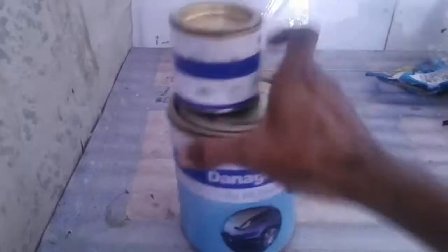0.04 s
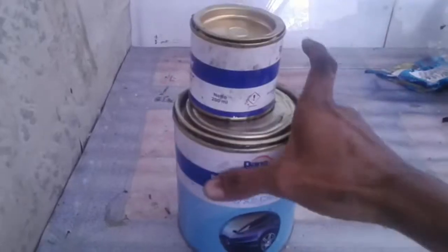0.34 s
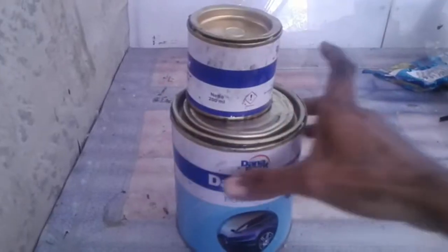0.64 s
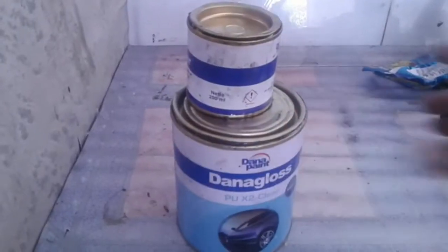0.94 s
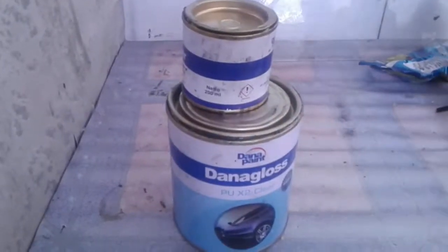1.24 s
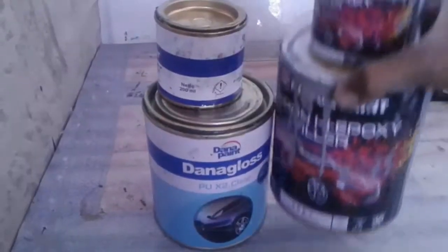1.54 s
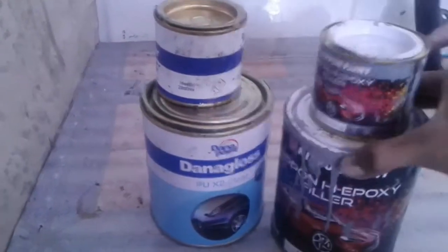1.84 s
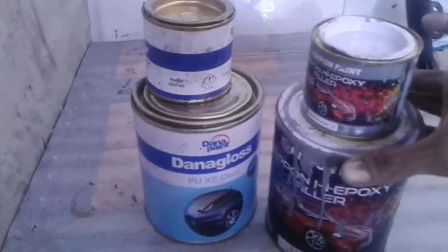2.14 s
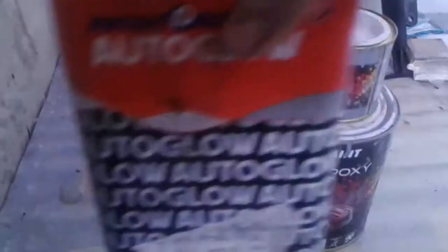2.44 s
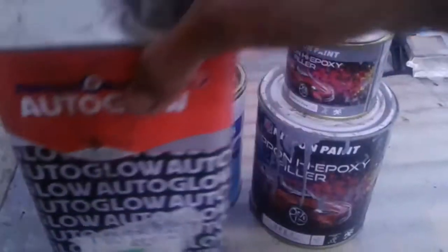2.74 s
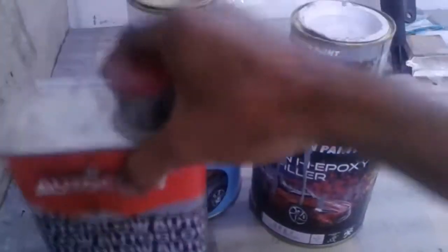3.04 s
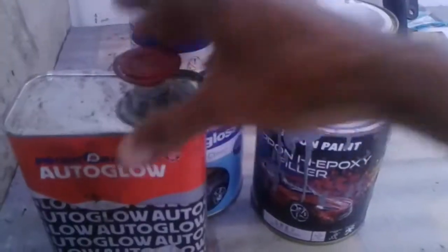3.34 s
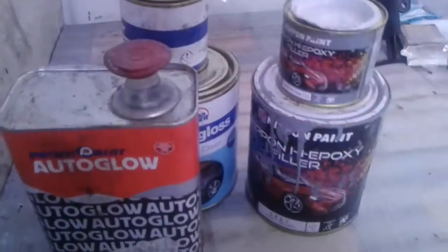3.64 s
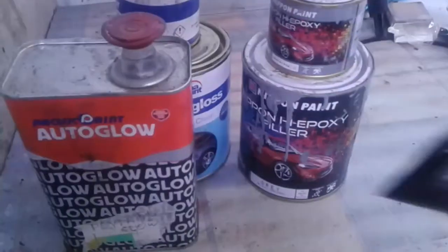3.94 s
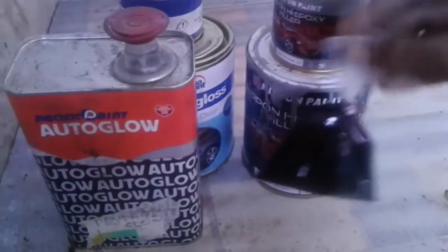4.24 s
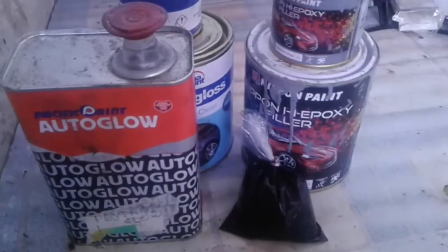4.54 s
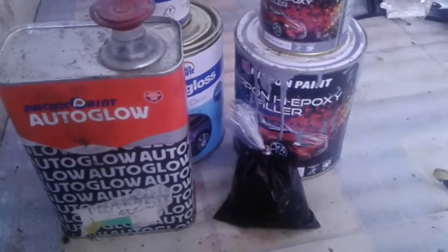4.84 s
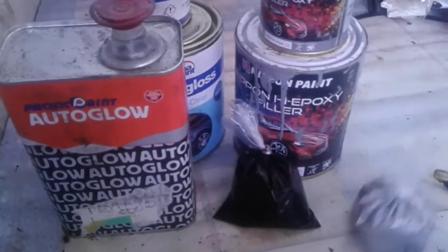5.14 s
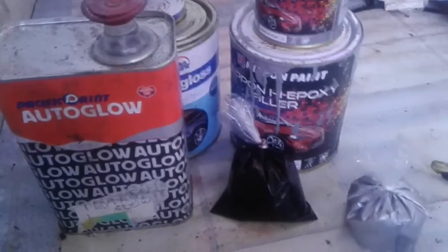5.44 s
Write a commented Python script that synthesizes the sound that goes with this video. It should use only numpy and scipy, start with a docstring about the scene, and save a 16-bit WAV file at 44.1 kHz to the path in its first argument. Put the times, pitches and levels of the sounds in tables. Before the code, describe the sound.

In a small, bare room, a small, dull microphone picks up low room noise and a faint hum. Two stacks of paint cans land on a table in turn, each with a sharp knock, a quick rattle and a metallic ring. A square tin clanks down edge by edge, ringing low. Last come two soft, crinkly plops as small filled plastic bags are dropped on the table.

```python
"""A table in a small, bare room, heard through a small, dull microphone over faint hum and room noise.
A stack of round paint cans is set down at 0.25 s and another near 1.9 s: each lands on its rim, slaps
flat and rocks briefly, thumping the table top and ringing the metal. Near 3.3 s a square tin lands on
one edge, then the other. Two small filled plastic bags rustle and plop down at 4.5 s and 5.3 s.
Along the way the hiss flickers around the second stack, and the level dips briefly four times."""
import sys
import numpy as np
from scipy import signal
from scipy.fft import rfft, irfft
from scipy.io import wavfile

SR = 44100
rng = np.random.default_rng(int(sys.argv[2]) if len(sys.argv) > 2 else 0)


def bounce(signal):
    """Save signal as a 16-bit WAV file at the path given by the first command-line argument."""
    frames = np.transpose(np.atleast_2d(signal))
    limited = np.clip(frames, -1, 1)
    pcm = np.round(limited * 32767).astype(np.int16)
    wavfile.write(sys.argv[1], SR, pcm)


N = 242682
TIME = np.arange(N) / SR
RING_TIME = TIME[:SR]

# rims landing on the table: (time [s], thump [dB], push length [ms], clank [dB], rim tick [dB],
# slap [dB], first rocking period [ms], clank loss per rock [dB], object)
LANDINGS = [(0.2514, -17.5, 2.8, -4.5, -23.5, -1, 11.7, 7, "first"),
            (1.9346, -3.5, 1.74, -7, -11.5, -2.5, 12.1, 3, "second"),
            (3.2675, -5, 1.6, -4.5, -21, -10.5, 16.2, 5.5, "tin"),
            (3.3004, -3.5, 1.5, -5, -16.5, -24, 10.7, 7, "tin")]


def first_stack():
    """The first stack of paint cans clanks, and its ring is soon choked as it lies flat."""
    # lid and base modes: (frequency [Hz], level [dB], t60 [s])
    modes = [(483, -11.5, 0.63), (568, -10, 0.21), (753, -19, 0.59), (830, -6, 0.27), (944, -19.5, 0.16),
             (948, -15.5, 0.12), (1334, -12.5, .22), (1460, -17, 0.46), (2400, -30.5, .15),
             (2430, -36.5, 0.18), (3280, -13, 0.092), (3720, -36.5, .07), (4060, -37.5, 0.21)]
    # colour of the dense, short-lived wall modes: (frequency [Hz], gain [dB])
    wall = [(150, -7), (500, 9.5), (1200, -2), (1600, 1), (1950, 1.5), (2450, 1), (2950, -5.5), (3700, 0.5),
            (5000, -8.5), (12000, -5.5)]
    return can(can_contacts("first"), modes, wall, ring_db=-18, rest_s=0.43, crack_db=15.5, lag_ms=2.59,
               rattle_db=-5.5, rattle_t60=0.03, wash_db=-12.5, wash_t60=0.21, table_db=-53)


def second_stack():
    """The cans of the second stack knock on each other, then land harder and rock for longer."""
    # lid and base modes: (frequency [Hz], level [dB], t60 [s])
    modes = [(601, -10, 0.16), (709, -25, 0.31), (760, -17.5, 0.27), (837, -13.5, 0.17), (954, -16.5, 0.26),
             (1230, -26, 0.17), (1378, -26, 0.28), (1502, -23, .18), (1640, -28.5, .14), (1804, -26, .16),
             (2972, -28.5, .14), (4210, -37, .11)]
    # colour of the wall modes: (frequency [Hz], gain [dB])
    wall = [(150, 9.5), (600, 13), (1100, 1), (1600, 4.5), (2400, -5), (3700, -1.5), (5000, -9),
            (12000, -7)]
    return can(can_contacts("second"), modes, wall, ring_db=-2.5, rest_s=2.0, crack_db=10, lag_ms=0.85,
               rattle_db=-1.0, rattle_t60=0.045, wash_db=-14.5, wash_t60=0.24, table_db=-49.5)


def square_tin():
    """The tin lands on one edge, then the other; its panels flex and ring low."""
    # panel modes: (frequency [Hz], level [dB], t60 [s])
    modes = [(240, -10.5, 0.34), (268.2, -20.5, 0.65), (308, -10, 0.075), (353, -7.5, 0.27),
             (524, -31, 0.087), (600, -15.5, 0.085), (680, -10, 0.044), (712, -12.5, 0.15),
             (791.5, -14.5, 0.22), (980, -22, 0.14)]
    # colour of the wall modes: (frequency [Hz], gain [dB])
    wall = [(150, 5.5), (700, 2), (1300, -3.5), (1900, -6), (2500, -4), (3300, -4), (4200, -6), (5500, -11),
            (7300, 3.5), (14000, -31)]
    return can(can_contacts("tin"), modes, wall, ring_db=-7, rest_s=3.47, crack_db=13, lag_ms=0.87,
               rattle_db=-3, rattle_t60=0.03, wash_db=-18, wash_t60=0.041, table_db=-61)


def can(contacts, modes, wall, ring_db, rest_s, crack_db, lag_ms,
        rattle_db, rattle_t60, wash_db, wash_t60, table_db):
    """A strike sends a crack through the sheet; it breaks into crowded wall modes; lid and base ring."""
    strikes, clank = np.zeros((2, N))
    crack = amp(crack_db) * bending_wave(lag_ms)
    wall_decay = amp(rattle_db) * fade(rattle_t60) + amp(wash_db) * fade(wash_t60)
    for s, _, _, clank_db, edge_hz in contacts:
        add(strikes, s, amp([clank_db]))
        burst = crack + wall_decay * rng.standard_normal(SR)
        add(clank, s, amp(clank_db) * butter(burst, edge_hz, "low"))
    ringing = amp(ring_db) * convolve(strikes, ring(modes)) * settle(TIME, rest_s)
    return thumps(contacts, table_db) + colour(clank, wall) + ringing


def can_contacts(name, knock_edge_hz=2000, rim_edge_hz=4760, slap_lag_s=0.0066):
    """One object's contacts: (time [s], thump [dB], push length [ms], clank [dB], clank edge [Hz])."""
    # cans shifting on each other and the tin's panels flexing:
    # (time [s], thump [dB], push length [ms], clank [dB], object)
    knocks = [(0.301, -10, 2.6, -47, "first"), (0.3134, -11, 0.91, -11, "first"),
              (0.3629, -10.5, 4.3, -30, "first"), (0.392, -18.5, 1.1, -21, "first"),
              (1.658, -11, 7.8, -62, "second"), (1.67, -15, 5.7, -52, "second"),
              (1.690, -37, 2.3, -37, "second"), (1.762, -13.5, 3.25, -48, "second"),
              (1.776, -16.5, 5.3, -25, "second"), (1.990, -9, 5.7, -15, "second"),
              (2.025, -14.5, 1.96, -22, "second"), (2.033, -6.5, 3.07, -17.5, "second"),
              (3.2709, -22, 0.42, -3, "tin"), (3.284, 0, 3.73, -18, "tin")]
    contacts = [(*knock, knock_edge_hz) for *knock, who in knocks if who == name]
    for s, thump_db, push_ms, clank_db, _, slap_db, period_ms, loss_db, who in LANDINGS:
        if who != name:
            continue
        # the flat base follows the rim, with a longer push and less clank
        contacts.append((s + slap_lag_s, slap_db, push_ms * 1.7, clank_db - 13.5, rim_edge_hz))
        for k, touch_s in enumerate(rocks(s, period_ms)):
            rock_db = thump_db - k * loss_db * 0.68  # the thump dies more slowly than the clank
            rock_ms = push_ms * 1.25 ** k  # each rock pushes for longer
            contacts.append((touch_s, rock_db, rock_ms, clank_db - k * loss_db, rim_edge_hz))
    return contacts


def rocks(s, period_ms, count=6, shrink=0.99):
    """Times at which a rocking rim touches down, each gap shorter than the last."""
    gaps_s = period_ms / 1000 * shrink ** np.arange(count)
    return s + np.cumsum(gaps_s) - gaps_s


def bending_wave(lag_ms, size=2048):
    """A click after crossing thin sheet metal: the treble runs ahead, and lag_ms scales the delay."""
    khz = np.fft.rfftfreq(size, 1 / SR) / 1000
    turns = lag_ms * (2 * np.sqrt(khz) - khz / np.sqrt(khz[-1]))
    chirp = irfft(np.exp(-2j * np.pi * turns))[:size // 2]
    return np.pad(chirp, (0, SR - size // 2))


def settle(t, rest_s, t60=0.025):
    """Gain of a ring that is choked once the can lies flat at rest_s."""
    return np.exp(-np.log(1000) * np.maximum(t - rest_s, 0) / t60)


def thumps(contacts, table_db, board_hz=60):
    """Each contact pushes the table top; a longer push is a duller thump, and the board rings on."""
    # table top modes: (frequency [Hz], level [dB], t60 [s])
    board_modes = [(78.7, -3.5, 0.2), (114.6, -2, 0.25), (133, -12.5, 0.14), (163.2, 0, 0.17),
                   (204, -7, 0.07), (236.75, -1.5, 0.38), (297, 7, 0.068), (330.6, 2, 0.11),
                   (460, 0.5, 0.032), (632, -10.5, 0.16)]
    force = np.zeros(N)
    for s, thump_db, push_ms, *_ in contacts:
        progress = np.minimum(RING_TIME * 1000 / push_ms, 1)
        add(force, s, amp(thump_db) * np.sin(np.pi * progress) ** 2)
    # air slips round the board, so it radiates little deep bass
    return butter(force, board_hz, "high") + amp(table_db) * convolve(force, ring(board_modes))


def rim_ticks(loss_db=4, scatter_db=3, t60=0.0061, low_edge_hz=4000):
    """The hard rim gives a short, bright tick at each touch."""
    envelope = np.zeros(N)
    for s, _, _, _, tick_db, _, period_ms, _, _ in LANDINGS:
        for k, touch_s in enumerate(rocks(s, period_ms)):
            touch_db = tick_db - k * loss_db + scatter_db * rng.standard_normal()
            add(envelope, touch_s, amp(touch_db) * fade(t60))
    return butter(envelope * rng.standard_normal(N), low_edge_hz, "high")


def lid_pings():
    """The small can rocks on the lid of the large one and sets single notes ringing."""
    # light rim touches: (time [s], frequency [Hz], level [dB], t60 [s], time until the rim lies flat [s])
    touches = [(.278, 932, -21, .5, .14), (.333, 3980, -39, .13, .05), (.394, 2400, -32, .08, .017),
               (1.778, 840, -32, .22, .1), (1.971, 838, -18.5, .28, .12), (1.971, 936, -21, .2, .08),
               (1.998, 762, -18.5, .42, .18)]
    notes = np.zeros(N)
    for s, hz, db, t60, rest_s in touches:
        add(notes, s, ring([(hz, db, t60)]) * settle(RING_TIME, rest_s))
    return notes


def bags(slump_t60=0.037, grain_db=5, grain_rate=1500, rustle_edge_hz=3500):
    """Thin film rustles as a bag swings in, then crackles as its soft load slumps on the table."""
    # film rustling in the air: (middle [s], length [s], level [dB])
    rustles = [(4.434, 0.073, -36), (4.472, 0.016, -38), (5.124, 0.061, -36), (5.177, 0.03, -30)]
    # colour of the plastic film: (frequency [Hz], gain [dB])
    film_colour = [(150, 18.5), (900, 7), (1700, 0.5), (2800, -2), (4200, 1.5), (5500, -3), (7000, 4.5),
                   (9000, -3.5), (15000, -7)]
    # colour of the load's dull slump: (frequency [Hz], gain [dB])
    load_colour = [(50, -5), (110, 23.5), (190, 17.5), (320, 15.5), (550, 6), (950, -7.5), (1500, -15),
                   (4000, -17)]
    landing, slump, swing = np.zeros((3, N))
    contacts = bag_contacts()
    for s, thump_db, _, crackle_db, crackle_t60 in contacts:
        add(landing, s, amp(crackle_db) * fade(crackle_t60))
        add(slump, s, amp(thump_db) * fade(slump_t60))
    for s, length_s, db in rustles:
        swing += amp(db) * np.exp(-(2 * (TIME - s) / length_s) ** 2)
    creases = unit(rng.standard_normal(N) * amp(grain_db * walk(grain_rate)))
    film = landing * creases + butter(swing * creases, rustle_edge_hz, "high", order=1)
    load = amp(-1) * colour(slump * rng.standard_normal(N), load_colour)
    return colour(film, film_colour) + load + thumps(contacts, table_db=-53.5)


def bag_contacts(fold_step_s=0.0056, growth_db=5.5, fold_t60=0.018):
    """Folds and sags: (time [s], thump [dB], push length [ms], crackle [dB], crackle t60 [s])."""
    # bags folding onto the table: (time [s], sinking time [s], last thump [dB], push length [ms],
    # first crackle [dB], last crackle [dB])
    drops = [(4.5448, .0225, -12, 2.7, -20, -14.5), (5.259, .011, -13, 2.4, -9.5, -29.5)]
    # the load then spreads and sags:
    # (delay after the last fold [s], thump relative to that fold [dB], crackle [dB], crackle t60 [s])
    sags = [(.01, -16, -33, .09), (0.046, -24, -35, 0.097)]
    contacts = []
    for s, sink_s, thump_db, push_ms, first_db, last_db in drops:
        steps = max(round(sink_s / fold_step_s), 1)
        for k, crackle_db in enumerate(np.linspace(first_db, last_db, steps + 1)):
            fold_db = thump_db - (steps - k) * growth_db  # each fold thumps harder
            contacts.append((s + sink_s * k / steps, fold_db, push_ms, crackle_db, fold_t60))
        for delay_s, relative_db, crackle_db, t60 in sags:
            contacts.append((s + sink_s + delay_s, thump_db + relative_db, 2 * push_ms, crackle_db, t60))
    return contacts


def room(direct, build_s=0.0016):
    """Bare walls close by add a diffuse tail in octave bands, the bass staying longest."""
    # reverberation: (frequency [Hz], t60 [s], level [dB])
    reverb = [(100, 0.63, -8), (300, 0.44, -9), (1000, 0.5, -12), (4000, 0.57, -18.5), (12130, 0.25, -10.5)]
    t60_curve, level_curve = np.array(reverb)[:, :2], np.array(reverb)[:, ::2]
    hz = np.maximum(np.fft.rfftfreq(SR, 1 / SR), 1)
    spectrum = np.exp(2j * np.pi * rng.random(len(hz)))
    tail = np.zeros(SR)
    for centre_hz in 62.5 * 2 ** np.arange(9):
        octaves_away = np.abs(np.log2(hz / centre_hz))
        band = irfft(spectrum * np.maximum(1 - octaves_away, 0), SR)
        envelope = unit(fade(at_hz(centre_hz, t60_curve)) * (1 - np.exp(-RING_TIME / build_s)))
        tail += band * envelope * amp(at_hz(centre_hz, level_curve))
    return direct + convolve(direct, tail)


def room_tone(waver_rad=2.23, waver_rate=12, flutter_db=3):
    """Low room noise and a faint hum that wavers in pitch and level."""
    # colour of the room noise: (frequency [Hz], gain [dB])
    air_colour = [(25, -5.5), (50, 36), (82, 28), (120, 25.5), (155, 22.5), (260, 13.5), (430, 18.5),
                  (620, 13), (1000, 10), (1750, 7), (2700, -2.5), (4200, 2), (6000, 1), (15000, -1)]
    # hum tones: (frequency [Hz], level relative to the room noise [dB])
    hum_tones = [(84, -3), (100, -12), (155, -7), (412, -11.5), (478, -20)]
    # rise and fall of noise and hum together: (time [s], level [dB])
    levels = [(0, -53), (.7, -48), (1.35, -46), (1.5, -38.5), (2.5, -42.5), (2.9, -40), (5.5, -39)]
    air = unit(colour(rng.standard_normal(N), air_colour))
    hum = np.zeros(N)
    for hz, db in hum_tones:
        gain = amp(db + flutter_db * walk(waver_rate))
        hum += gain * np.sin(2 * np.pi * hz * TIME + waver_rad * walk(waver_rate))
    return amp(np.interp(TIME, *np.transpose(levels))) * (air + hum)


def hiss(low_edge_hz=5600, rise_db=5):
    """A thin treble hiss that rises and flickers for about a second."""
    # course of the hiss: (time [s], level [dB])
    levels = [(0, -56), (.7, -44.5), (2.45, -46.5), (2.9, -50), (4.5, -61)]
    # flickering stretch: (start [s], end [s], depth [dB], changes [1/s])
    flicker = (1.49, 2.445, 3, 300)
    start_s, end_s, depth_db, rate = flicker
    noise = butter(rng.standard_normal(N), low_edge_hz, "high", order=4)
    flicker_db = (rise_db + depth_db * walk(rate)) * (TIME > start_s) * (TIME < end_s)
    return amp(np.interp(TIME, *np.transpose(levels)) + flicker_db) * noise


def amp(db):
    """Decibels to gain."""
    return 10 ** (np.asarray(db) / 20)


def unit(x):
    """Scale to rms 1."""
    return x / np.sqrt(np.mean(x ** 2))


def at_hz(hz, points):
    """Read (frequency [Hz], value) points on a log-frequency axis."""
    point_hz, value = np.transpose(points)
    return np.interp(np.log(np.maximum(hz, 1)), np.log(point_hz), value)


def convolve(x, response):
    """Pass x through a response, keeping its length."""
    return signal.oaconvolve(x, response)[:len(x)]


def colour(x, points, size=4096):
    """Causal filter through (frequency [Hz], gain [dB]) points, built from its cepstrum."""
    gain = amp(at_hz(np.fft.rfftfreq(size, 1 / SR), points))
    cepstrum = irfft(np.log(gain))
    cepstrum[1:size // 2] *= 2
    cepstrum[size // 2 + 1:] = 0
    return convolve(x, irfft(np.exp(rfft(cepstrum))))


def butter(x, hz, kind, order=2):
    """Low-pass or high-pass filter."""
    return signal.sosfilt(signal.butter(order, hz, kind, fs=SR, output="sos"), x)


def add(track, s, sound):
    """Mix a sound into a track at time s."""
    start = int(s * SR)
    track[start:start + len(sound)] += sound[:N - start]


def fade(t60):
    """One second of exponential decay."""
    return np.exp(-np.log(1000) * RING_TIME / t60)


def ring(modes):
    """Impulse response of a set of damped modes."""
    return sum(amp(db) * fade(t60) * np.sin(2 * np.pi * hz * RING_TIME) for hz, db, t60 in modes)


def walk(rate):
    """A random curve within +-2 that heads for a new value `rate` times a second."""
    return np.interp(TIME * rate, np.arange(N), np.clip(rng.standard_normal(N), -2, 2))


def scene():
    """The objects land one after another in the room, over room tone and hiss."""
    on_table = first_stack() + second_stack() + square_tin() + rim_ticks() + lid_pings() + bags()
    return (room(on_table) + room_tone() + hiss())[None]


def record(dry, dip_out_s=0.084, dip_in_s=0.088, dip_curve=1.2, top_hz=15800):
    """One small microphone that falls away above the mid treble; the level dips briefly four times."""
    # microphone response: (frequency [Hz], gain [dB])
    microphone = [(20, -16.5), (50, -13.5), (90, 0), (4200, 0.5), (4700, -8), (5300, -18.5), (6000, -20),
                  (7000, -18.5), (8500, -21.5), (15000, -22.5)]
    # brief dips to silence: (middle [s], silent length [s])
    dips = [(1.436, 0.031), (2.498, 0.008), (3.841, 0.008), (4.943, 0.0021)]
    sound = colour(dry[0], microphone)
    for s, silent_s in dips:
        falling = (s - silent_s / 2 - TIME) / dip_out_s
        rising = (TIME - s - silent_s / 2) / dip_in_s
        sound *= np.clip(np.maximum(falling, rising), 0, 1) ** dip_curve
    low_pass = signal.ellip(10, .2, 80, top_hz, fs=SR, output="sos")
    return signal.sosfilt(low_pass, sound)[None]


dry = scene()
out = record(dry)
bounce(out)
```